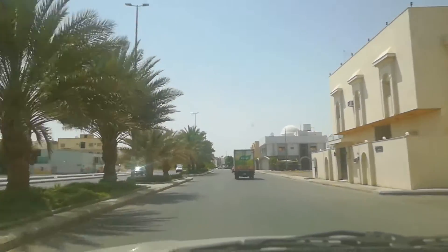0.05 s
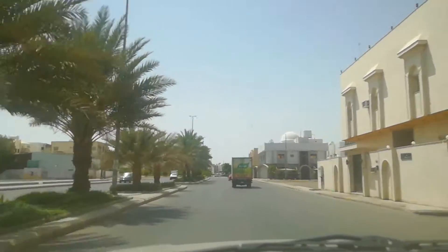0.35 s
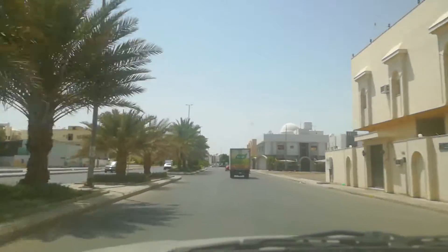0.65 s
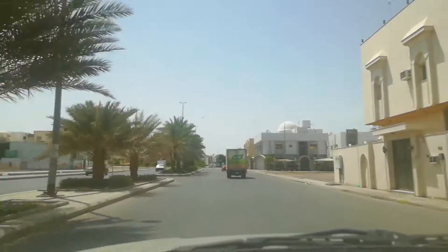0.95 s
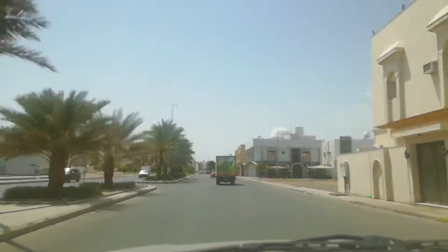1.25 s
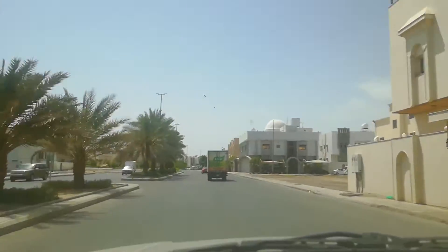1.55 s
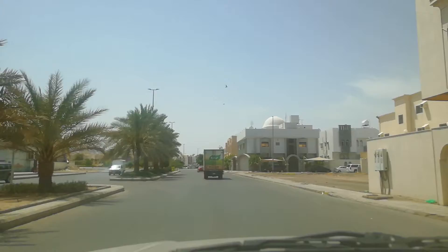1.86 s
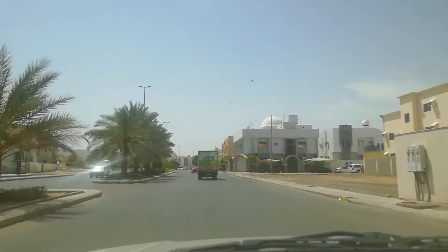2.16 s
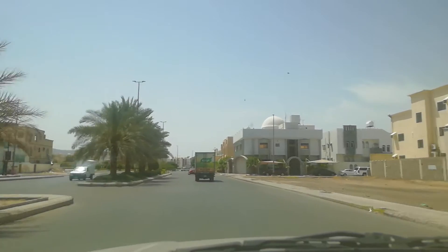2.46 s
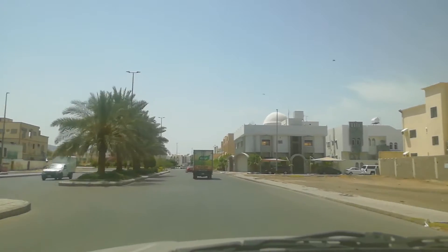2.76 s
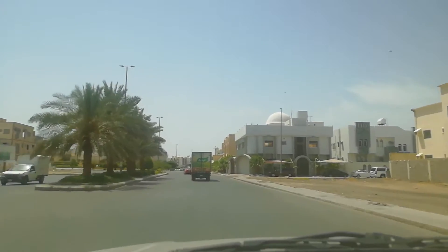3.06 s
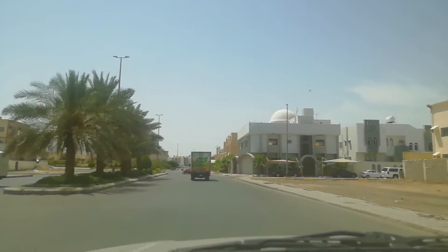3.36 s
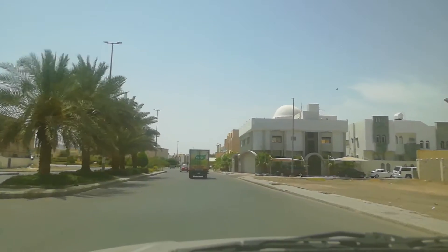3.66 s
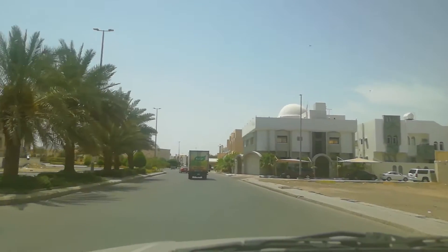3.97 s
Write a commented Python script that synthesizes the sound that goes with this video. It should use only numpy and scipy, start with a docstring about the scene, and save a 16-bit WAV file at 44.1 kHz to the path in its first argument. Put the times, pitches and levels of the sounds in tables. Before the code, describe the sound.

A low car rumble with soft tyre rush runs throughout, heard from inside and duller on the right. Light pings come around 0.5 seconds. From 1 to 1.6 seconds the tyres drum over a rough patch while plastic trim chatters and scrapes and a loose part pings, with a loud knock near 1.5. The rumble then settles, with a low tyre drone, soft knocks and faint ticks after 3 seconds.

```python
"""The low rumble of a car on a street, heard from inside, with cabin boom and a soft tyre rush.
The wheels cross a slightly uneven stretch, then drum over a rough patch: the body heaves, the
plastic dashboard trim chatters and scrapes, a small loose part pings, and a hard object knocks,
once loudly and three times softly. Air drones inside the tyres, and plastic ticks faintly
near the end. The right microphone is muffled and late."""
import sys
import numpy as np
from scipy import signal
from scipy.fft import rfft, irfft, next_fast_len
from scipy.io import wavfile
from scipy.ndimage import uniform_filter1d

SR = 44100
rng = np.random.default_rng(int(sys.argv[2]) if len(sys.argv) > 2 else 0)


def unload_wav(signal):
    """Save mono or channel-first audio to the path in sys.argv[1] as 16-bit WAV at rate SR, clipped to [-1, 1]."""
    wavfile.write(
        sys.argv[1],
        SR,
        np.round(np.clip(np.atleast_2d(signal).T, -1, 1) * 32767).astype(np.int16),
    )


N = 176400
T = np.arange(N) / SR
RING_T = np.arange(SR // 5) / SR

# Tone colours of the noise layers. Each row: frequency in Hz, relative level in dB.
HISS_COLOUR = [(100, -13), (1000, 1), (3000, -2.5), (8000, -7), (11000, -11), (16000, -12)]
TICK_COLOUR = [(500, -25), (2000, -17), (5000, 1), (8000, 4), (10000, -4), (13000, -17), (16000, -28)]
SCRAPE_COLOUR = [(1000, -23), (3000, 6), (5500, 1.5), (7800, 2), (8800, -10.5), (10500, -16.5),
                 (12000, -32), (16000, -56)]
CRACK_COLOUR = [(300, -8), (1500, -5), (2800, 2), (5000, -5.5), (7500, -3.5), (9000, -23), (12000, -38),
                (16000, -56)]
TRIM_COLOUR = [(150, -43), (400, -9.5), (750, -4), (1100, 0.5), (1600, -5), (2000, -2.5), (2400, -2),
               (3000, -5.5), (4200, -5.5), (5500, -4.5), (7200, -4.5), (8200, -11.5), (9500, -25.5),
               (12000, -56), (16000, -60)]
TYRE_COLOUR = [(100, -31.5), (350, -0.5), (500, -0.5), (700, 0.5), (1000, -9.5), (1600, -13.5),
               (2400, -21.5), (4000, -23), (7000, -23.5), (9000, -26.5), (11000, -42), (16000, -70)]
DRUMMING_COLOUR = [(30, -28), (70, -18), (105, 1), (128, -7), (155, 4.5), (200, -8), (260, -5.5),
                   (340, -12.5), (450, -14.5), (650, -23.5), (1200, -28), (3000, -84), (8000, -140)]
BOOM_COLOUR = [(40, -34), (80, -7.5), (110, -1), (135, -1.5), (175, -8.5), (215, -6), (265, -10.5),
               (310, -11), (370, -19), (500, -23.5), (700, -37.5), (1200, -44), (3000, -83), (8000, -130)]
RUMBLE_COLOUR = [(6, -16), (12, -9.5), (19, -5.5), (26, 6), (32, -3.5), (41, 1), (58, -11.5), (75, -10),
                 (100, -22), (170, -53.5), (400, -78), (1200, -170)]

# Level rides of the running layers. Each row: time in seconds, relative level in dB.
CHATTER_RIDE = [(0, -65.5), (.14, -63), (.28, -66.5), (.35, -53.5), (.44, -53.5), (.5, -58), (.66, -62.5),
                (.76, -76), (.88, -60.5), (.95, -60), (.99, -42.5), (1.06, -39.5), (1.12, -44.5),
                (1.135, -48.5), (1.16, -43.5), (1.185, -48.5), (1.21, -46.5), (1.25, -46), (1.32, -42),
                (1.35, -47.5), (1.37, -40.5), (1.425, -51.5), (1.47, -46), (1.52, -55), (1.575, -49),
                (1.64, -57.5), (1.8, -68), (2.2, -76), (3.85, -69.5), (3.93, -61), (4, -73)]
DRONE_RIDE = [(0, -58.5), (.15, -40.5), (.35, -49), (.9, -57.5), (1.8, -55), (2.4, -49), (3.3, -51),
              (4, -54)]
DRUMMING_RIDE = [(.92, -65), (.98, -37.5), (1.04, -30.5), (1.13, -30.5), (1.23, -32), (1.3, -36),
                 (1.42, -38.5), (1.55, -41), (1.61, -43.5), (1.9, -83)]
SHAKE_RIDE = [(0.0, -33.5), (0.09, -32.5), (0.11, -39), (0.3, -26.5), (0.72, -33.5), (0.79, -26),
              (0.81, -33), (0.96, -41), (0.98, -20), (1.07, -27.5), (1.11, -20.5), (1.15, -30), (1.19, -17),
              (1.24, -34.5), (1.27, -19), (1.4, -19.5), (1.49, -26.5), (1.54, -22.5), (1.59, -35.5),
              (2.18, -33), (2.42, -38.5), (2.67, -35), (2.77, -45.5), (2.81, -33), (3.11, -37),
              (3.13, -38.5), (3.53, -34), (3.61, -44), (3.74, -35.5), (4.0, -38.5)]

# Cues for the small hits. Each row: start in seconds, relative level in dB.
TICK_CUES = [(3.218, -55), (3.362, -58), (3.389, -54), (3.445, -50), (3.777, -53), (3.898, -57)]
PING_CUES = [(.317, -47), (.346, -50), (.411, -46), (.429, -50), (.464, -45), (.519, -44), (.568, -51),
             (.5905, -39), (.963, -28), (.985, -38), (1.061, -30), (1.222, -37), (1.335, -37),
             (1.393, -36.5), (1.405, -38), (1.602, -50), (1.817, -54), (1.897, -45), (2.449, -51)]
KNOCK_CUES = [(1.4534, -23.5), (1.546, -36.5), (2.868, -45.5), (3.926, -54)]
# Plastic sliding on plastic. Each row: start in seconds, peak level in dB, length in seconds.
SCRAPE_CUES = [(1.042, -53, 0.097), (1.102, -41.5, 0.032), (1.198, -42.5, 0.02), (1.309, -44.5, .03),
               (1.352, -47, .03)]
# Harder hits of the trim. Each row: start in seconds, relative level in dB, T60 in seconds.
CLACK_CUES = [(.9628, -42.5, 0.077), (0.9842, -32.5, 0.014), (1.0067, -37, 0.038), (1.0202, -39, 0.015),
              (1.039, -42, 0.039), (1.058, -38, 0.071), (1.108, -37, 0.024), (1.2044, -35.5, 0.016),
              (1.2855, -40.5, 0.044), (1.335, -33, 0.024), (1.542, -43, 0.03), (1.895, -50, 0.047)]

# Ringing modes of the struck things. Each row: pitch in Hz, relative level in dB, T60 in seconds.
LOOSE_PART_MODES = [(2360, -1, .04), (2450, -8, .025), (2250, -15, .02), (3500, -22, .03),
                    (6900, -19, .025)]
DASHBOARD_MODES = [(370, -12, 0.033), (466, -13, .035), (572, -7.5, 0.044), (673, -7, .04),
                   (800, -4.5, 0.04), (980, -14.5, 0.049), (1376, -5.5, .045), (1690, -1, 0.017),
                   (2050, -11, 0.042), (2350, -12, .03), (2910, -20.5, 0.085)]
# Resonances of the trim panels. Each row: centre in Hz, width in Hz, added level in dB.
PANEL_RESONANCES = [(710, 130, 3), (805, 85, 2.5), (1062, 88, -4), (1422, 200, -5.5), (1630, 140, -1),
                    (2427, 220, -8)]
# Muffling of the right microphone. Each row: frequency in Hz, gain against the left in dB.
RIGHT_EQ = [(20, -.1), (80, -.3), (160, -1), (280, -2.6), (400, -5), (700, -8), (1300, -13), (2400, -18.5),
            (4400, -22), (8000, -21), (15000, -15)]


def amp(db):
    """Decibels to gain."""
    return 10 ** (np.asarray(db) / 20)


def gain(points, hz):
    """Gain of an EQ curve, drawn on a log frequency axis."""
    freqs, db = np.transpose(points)
    return amp(np.interp(np.log(hz + 1), np.log(freqs + 1), db))


def ride(points):
    """A fader move in dB, one value per sample."""
    return np.interp(T, *np.transpose(points))


def filtered(x, response):
    """Shape a sound with a frequency response."""
    size = next_fast_len(x.shape[-1] + 8192)
    hz = np.fft.rfftfreq(size, 1 / SR)
    return irfft(rfft(x, size) * response(hz), size)[..., :x.shape[-1]]


def noise(colour, size=N):
    """Coloured noise of rms 1."""
    x = filtered(rng.standard_normal(size), lambda hz: gain(colour, hz))
    return x / np.sqrt(np.mean(x ** 2) + 1e-20)


def steady(x, size):
    """Even out the chance swells of a noise, smoothing over size samples."""
    power = uniform_filter1d(uniform_filter1d(x * x, size), size)
    return x / np.sqrt(np.abs(power) + 1e-9)


def decay(t60, attack_s=0.00031):
    """Envelope of a hit: a snap up, then a 60 dB fall in t60 seconds."""
    return np.exp(-np.log(1000) * RING_T / t60) * (1 - np.exp(-RING_T / attack_s))


def burst(colour, t60):
    """Many close modes dying together."""
    return noise(colour, size=len(RING_T)) * decay(t60)


def ring(modes, scatter_db=1.2):
    """Damped modes, balanced a little differently at each blow."""
    sound = np.zeros(len(RING_T))
    for hz, db, t60 in modes:
        strength = amp(db + scatter_db * rng.standard_normal()) * rng.choice([-1, 1])
        sound += strength * decay(t60) * np.sin(2 * np.pi * hz * RING_T)
    return sound


def place(events):
    """Lay (start in seconds, sound) pairs on the timeline."""
    track = np.zeros(N + SR)
    for start, sound in events:
        track[round(start * SR):][:len(sound)] += sound
    return track[:N]


def microphone_hiss():
    """Each microphone adds its own faint hiss."""
    return amp(-69.5) * np.array([noise(HISS_COLOUR), noise(HISS_COLOUR)])


def right_microphone(x, delay_s=0.00049, muffle_rad=1.47, muffle_hz=497):
    """The cabin sound reaches the right microphone later and duller."""
    def response(hz):
        lag = 2 * np.pi * hz * delay_s + muffle_rad * np.arctan(hz / muffle_hz)
        return gain(RIGHT_EQ, hz) * np.exp(-1j * lag)
    return filtered(x, response)


def cabin_echo(x, wet_db=-12):
    """Direct sound plus the brief echo from glass and dashboard."""
    tail = rng.standard_normal(len(RING_T)) * decay(t60=0.05)
    wet = signal.fftconvolve(x, tail / np.linalg.norm(tail))[:N]
    return (x + amp(wet_db) * wet) / np.sqrt(1 + amp(wet_db) ** 2)


def ticks():
    """Plastic settles with tiny ticks."""
    return place((start, amp(db) * burst(TICK_COLOUR, t60=0.018)) for start, db in TICK_CUES)


def scrapes():
    """Panels slide against each other in short, bright swipes."""
    swipes = []
    for start, db, length_s in SCRAPE_CUES:
        size = round(length_s * SR)
        swipes.append((start, amp(db) * np.hanning(size) * noise(SCRAPE_COLOUR, size)))
    return place(swipes)


def loose_part(tick_db=-12.5):
    """A small hard part jumps, ticks against the trim and rings briefly."""
    pings = []
    for start, db in PING_CUES:
        ping = ring(LOOSE_PART_MODES) + amp(tick_db) * burst(TRIM_COLOUR, t60=0.025)
        pings.append((start, amp(db) * ping))
    return place(pings)


def knocks(crack_db=-28.5, crack_growth=1.46):
    """An object hits the dashboard: a hollow ring and a crack. Softer blows are duller."""
    hardest_db = max(db for _, db in KNOCK_CUES)
    blows = []
    for start, db in KNOCK_CUES:
        hollow = amp(db) * ring(DASHBOARD_MODES)
        crack = amp(crack_db + crack_growth * (db - hardest_db)) * burst(CRACK_COLOUR, t60=0.031)
        blows.append((start, hollow + crack))
    return place(blows)


def panel_response(hz):
    """The trim panels resonate and colour whatever rattles on them."""
    return 1 + sum(amp(db) * 1j * hz * width / (centre ** 2 - hz ** 2 + 1j * hz * width)
                   for centre, width, db in PANEL_RESONANCES)


def trim_rattle(contacts_per_s=450, spread_db=4, rub_share=0.18, split_hz=5400, body_growth=1.026):
    """Plastic panels chatter in dense random contacts over smooth rubbing, with a few harder clacks."""
    touches = rng.random(N) < contacts_per_s / SR
    contacts = touches * amp(spread_db * np.clip(rng.standard_normal(N), -2, 2))
    energy = np.abs(signal.fftconvolve(contacts ** 2, decay(t60=0.016) ** 2)[:N])
    grain = np.sqrt(energy / energy.mean() + rub_share)
    chatter = steady(grain * noise(TRIM_COLOUR), size=1000)
    # The chatter below 5.4 kHz follows the level ride, with a softer top.
    body = filtered(chatter, lambda hz: 1 / (1 + (hz / split_hz) ** 4))
    level_db = ride(CHATTER_RIDE)
    body_db = level_db.max() + body_growth * (level_db - level_db.max())
    clacks = place((start, amp(db) * burst(TRIM_COLOUR, t60)) for start, db, t60 in CLACK_CUES)
    rattle = amp(body_db) * body + amp(level_db - 5) * (chatter - body) + clacks
    return amp(-1.5) * cabin_echo(filtered(rattle, panel_response))


def tyre_rush():
    """A soft, even bed of rolling tyres."""
    return amp(-59) * noise(TYRE_COLOUR)


def tyre_drone(centre_hz=262.6, width_hz=27.5):
    """Air rings inside the tyres: a narrow band of noise that swells and sinks."""
    cavity = filtered(rng.standard_normal(N), lambda hz: (1 + ((hz - centre_hz) / width_hz) ** 2) ** -2)
    return amp(ride(DRONE_RIDE)) * steady(cavity, size=5000)


def rough_patch(split_hz=170, bright_growth=1.13):
    """The tyres drum over broken asphalt, brightest where they hit hardest."""
    level_db = ride(DRUMMING_RIDE)
    drumming = steady(noise(DRUMMING_COLOUR), size=2000)
    low = filtered(drumming, lambda hz: 1 / (1 + (hz / split_hz) ** 10))
    high_db = level_db.max() + bright_growth * (level_db - level_db.max())
    return amp(level_db) * low + amp(high_db) * (drumming - low)


def cabin_boom(shake_db, median_db=-45, follow_share=0.44):
    """The cabin booms, following the body's shaking with gentler swings."""
    level_db = median_db + follow_share * (shake_db - np.median(shake_db))
    return amp(level_db) * steady(noise(BOOM_COLOUR), size=5000)


def body_rumble(shake_db, lift_db=1):
    """The road shakes the car body: a deep rumble that heaves with each jolt."""
    return amp(shake_db + lift_db) * steady(noise(RUMBLE_COLOUR), size=3000)


def scene():
    """Road layers and dashboard rattles, mixed and heard through two microphones."""
    shake_db = ride(SHAKE_RIDE)
    road = body_rumble(shake_db) + cabin_boom(shake_db) + tyre_drone() + tyre_rush() + rough_patch()
    dashboard = trim_rattle() + scrapes() + loose_part() + knocks() + ticks()
    left = road + dashboard
    return np.array([left, right_microphone(left)]) + microphone_hiss()


def record(dry):
    """A brick-wall high cut at 15.7 kHz."""
    return filtered(dry, lambda hz: hz < 15700)


dry = scene()
out = record(dry)
unload_wav(out)
```